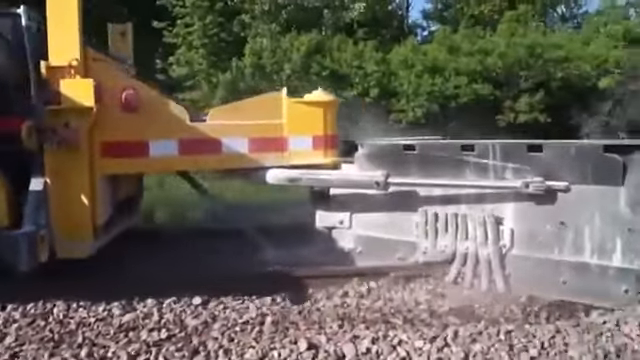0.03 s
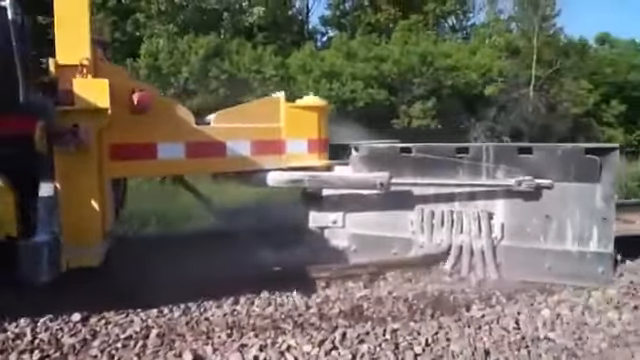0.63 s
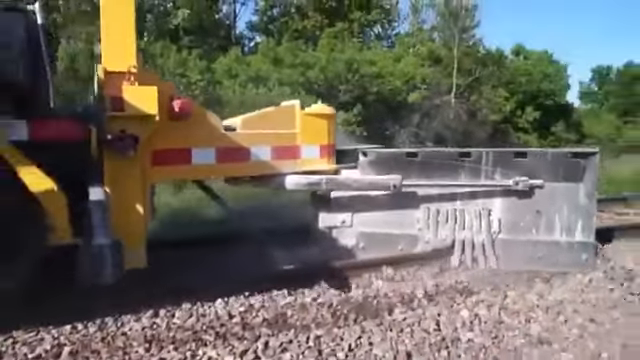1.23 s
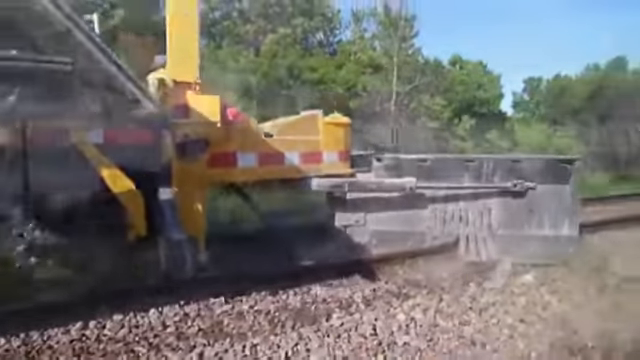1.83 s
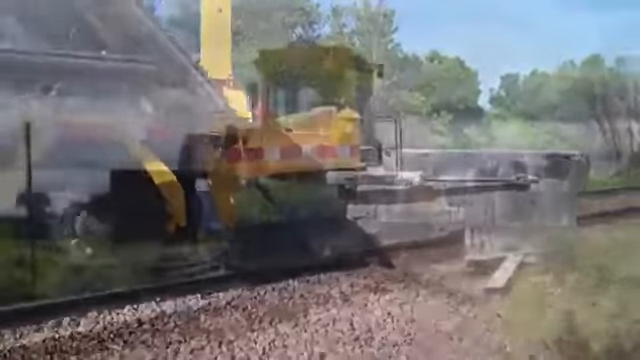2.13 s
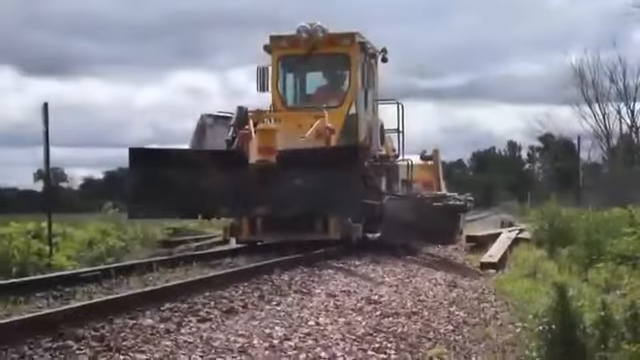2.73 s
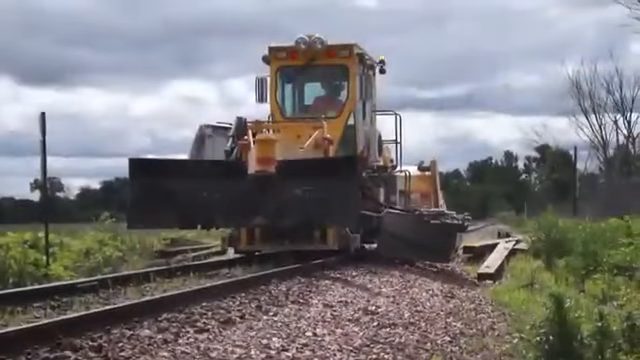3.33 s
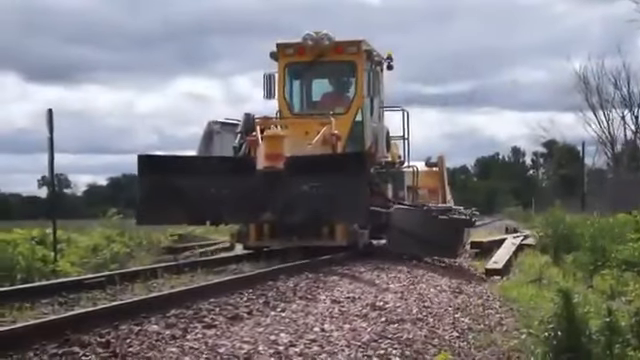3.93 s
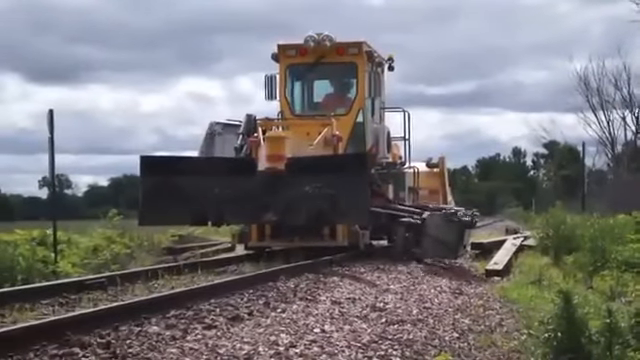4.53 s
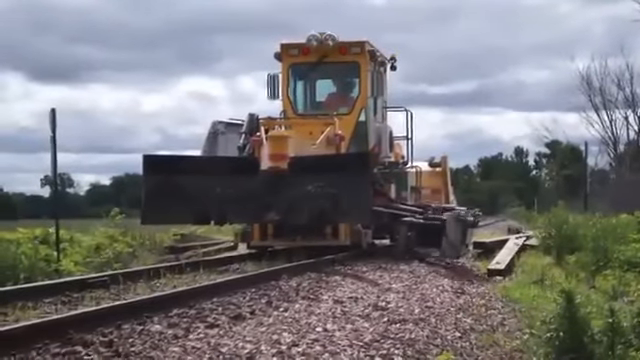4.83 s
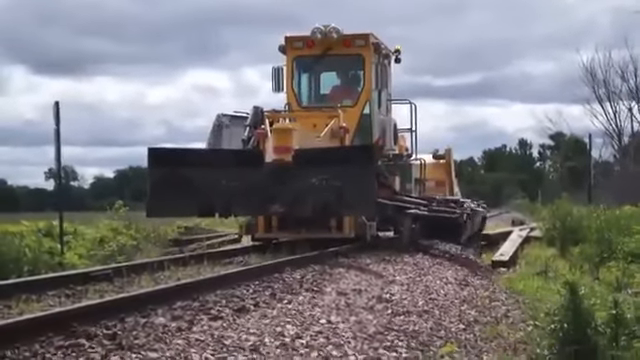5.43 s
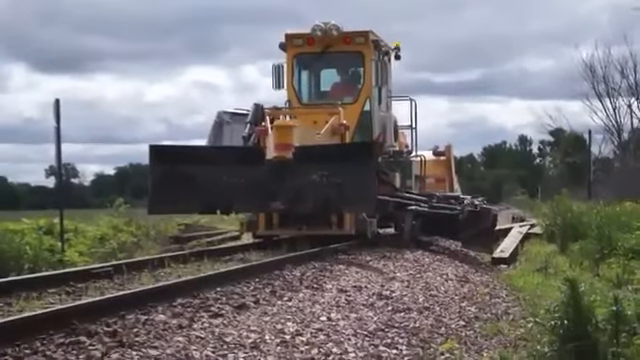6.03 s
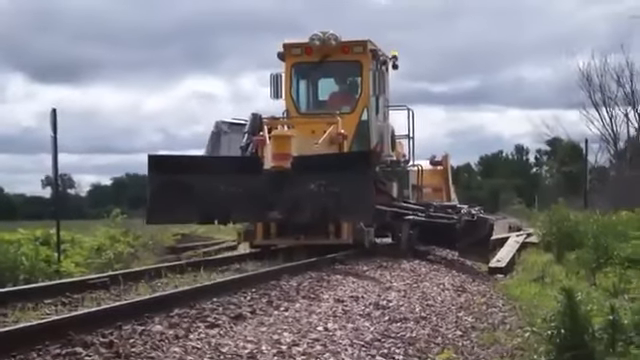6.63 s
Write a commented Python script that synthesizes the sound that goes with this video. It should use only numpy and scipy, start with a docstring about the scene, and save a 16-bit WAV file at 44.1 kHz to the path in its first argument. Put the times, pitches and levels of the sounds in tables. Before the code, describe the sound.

Stones grind against groaning steel, giving way to a more distant high-revving diesel engine, hydraulic whine and a few clanks.

```python
"""Stones grind and chink close by as a ballast regulator's steel wing ploughs them, ringing and groaning.
From about 2 s this fades into the machine further down the track. Its diesel runs at high revs and
drives two hydraulic pumps, which whine and pull the revs down as they move the wing. From about 4 s
the wing clanks in its joints. Two microphone ports in a small housing listen from the trackside."""
import sys
import numpy as np
from scipy import signal
from scipy.fft import rfft, irfft, next_fast_len
from scipy.io import wavfile

SR = 44100
rng = np.random.default_rng(int(sys.argv[2]) if len(sys.argv) > 2 else 0)


def put_to_file(sound):
    """Save the sound as 16-bit audio at rate SR, in the file named by the first command-line argument."""
    columns = np.atleast_2d(sound).T  # one column per channel
    safe = np.clip(columns, -1, 1)
    whole_steps = np.round(safe * 32767)
    wavfile.write(sys.argv[1], SR, whole_steps.astype(np.int16))


N = 294588
T = np.arange(N) / SR
FFT_SIZE = next_fast_len(N + 8192)
HZ = np.fft.rfftfreq(FFT_SIZE, 1 / SR)

# All table levels are relative.
# Push into the heap. Each row: time in seconds, then heave, grind and crunch levels in dB.
PLOUGH_LEVELS = [(0, -28.5, -23, -21.5), (.7, -28.5, -20, -22.5), (1.35, -29, -20.5, -22.5),
                 (1.75, -28, -22.5, -24.5), (2.2, -32.5, -27.4, -29.5), (2.55, -41, -35.5, -35.5),
                 (2.9, -54, -33, -43)]
# Stone noise. Each row: frequency in Hz, density in dB.
STONE_SPECTRUM = [(40, -52), (95, -42), (165, -11.5), (260, -10), (430, 0), (600, -2.5), (800, 2.5),
                  (1200, 2), (1900, -7.5), (2900, -8), (4100, -5), (6000, -12.5), (10000, -23.5),
                  (12500, -34.5)]
# Wing plate resonances. Each row: frequency in Hz, width in Hz, level in dB.
PLATE_MODES = [(200, 8, -47), (252, 12, -45), (296, 10, -39), (462, 10, -34), (662, 7, -37), (904, 8, -36),
               (1815, 18, -37), (1910, 20, -35.5), (1990, 18, -37.5), (2654, 5, -42), (3850, 50, -37)]
# Stones on the plate close by, later knocks from the distant machine.
# Each row: start in seconds, level in dB, pitch in Hz, swell in seconds.
THUMPS = [(0, -22.5, 294, 0.022), (0.268, -16.5, 1240, 0.008), (.278, -27, 2700, 0.011),
          (.28, -24.5, 4830, 0.0075), (0.698, -18, 890, 0.019), (0.713, -17, 450, 0.012),
          (1.06, -19.5, 423, .022), (1.18, -21, 2780, 0.0063), (1.235, -12, 1210, 0.0049),
          (1.326, -20.5, 433, 0.013), (1.395, -21.5, 248, 0.028), (1.413, -19.5, 480, 0.012),
          (1.43, -36, 182, 0.018), (1.611, -22.5, 1870, 0.0067), (1.71, -30, 307, 0.0064),
          (1.833, -25, 480, 0.013), (1.898, -26.5, 278, 0.011), (2.2, -25, 410, 0.0079),
          (2.28, -20, 830, 0.0069), (2.37, -24.5, 1000, 0.021), (5.269, -24, 840, 0.0022),
          (5.709, -33, 330, 0.0027)]
# Wing groans and one brief swell of the second pump.
# Each row: start and length in seconds, pitch in Hz, level in dB.
WAVERING_TONES = [(0.04, 0.7, 753, -33.5), (0.563, 0.11, 735, -24.5), (1.107, 0.68, 1195, -25.5),
                  (1.283, 0.907, 743, -28.5), (1.724, 0.52, 750.7, -29), (1.776, 0.48, 1198, -32.5),
                  (2.304, 0.22, 1218, -33.5)]
# Wing rubs, and the main pump's fourth harmonic swelling twice.
# Each row: start and length in seconds, pitch and width in Hz, level in dB.
ROUGH_TONES = [(1.297, 0.42, 1200, 8.7, -45), (2.427, 0.29, 714, 8.2, -36.5), (2.66, 0.091, 1240, 71, -34),
               (2.723, 0.98, 1488, 20, -43.5), (3.657, 0.32, 1682, 10, -44.5),
               (4.303, 0.35, 1622, 11, -41.5)]
# Firing strengths. Each entry: one cylinder's level in dB.
CYLINDERS_DB = [7.9, 2.7, 5.6, 1.7, 4.3, 3.6]
# Block and fan noise. Each row: frequency in Hz, density in dB.
ENGINE_SPECTRUM = [(25, -32), (55, -25.5), (95, -29), (160, -23.5), (280, -12), (400, -8), (600, -8.5),
                   (680, -4.5), (745, 2), (1200, -2), (1800, -8.5), (3000, -16), (4300, -14.5),
                   (9000, -32.5), (11500, -64)]
# Exhaust tones. Each row: multiple of the crank rate, level in dB.
EXHAUST_ORDERS = [(3, -70), (4.5, -62), (6, -59), (7, -64), (8, -61), (9, -56), (12, -57), (15, -55)]
# Pump tones. Each row: multiple of that pump's tooth rate, level in dB.
NEAR_MAIN_ORDERS = [(1, -33), (2, -36), (4, -39), (10, -46)]
NEAR_SECOND_ORDERS = [(1, -35), (2, -32), (3, -32.5)]
FAR_HUM_ORDERS = [(1, 0), (4, -8), (11, -19), (13, -23)]  # main pump, running free
FAR_STRAIN_ORDERS = [(3, -22), (6, -25.5), (7, -19.5), (8, -24), (9, -25.5), (10, -20), (11, -24),
                     (12, -24), (14, -30), (15, -28), (16, -35), (17, -36)]  # main pump, under pressure
FAR_SECOND_ORDERS = [(1, -50.5), (2, -41), (3, -50), (5, -55)]
# Valve feeding the wing's cylinders. Each row: opening and closing in seconds, whine level in dB.
STROKES = [(2.15, 3.597, -35), (3.97, 5.749, -33.5), (6.006, 6.267, -29.5)]
# Swells as the machine creeps on. Each row: time in seconds, then whine, feed pipe and whistle in dB.
SWELLS = [(2.5, 2, -17.5, -27), (2.93, 1, -5.5, -22), (3.25, 1, -9.5, -21), (3.42, 3, -14.5, -18),
          (3.58, 2, -11, -15), (4.05, -0.5, -10, -18), (4.25, -9, -8, -25), (4.37, -0.5, -9, -12),
          (4.6, -3.5, -17, -26), (4.85, 1.5, -11.5, -19), (5.15, -3, -8, -14), (5.45, -3.5, -8.5, -15),
          (5.72, 1, -8, -21), (6.2, -8.5, -12, -25)]
# Far second pump's swells. Each row: time in seconds, gain in dB.
SECOND_SWELLS = [(2.6, 2), (2.9, -2), (3.38, 3), (3.6, 1), (4.0, 0), (4.45, -2), (5.3, -0.5), (5.9, 0),
                 (6.68, 2)]
# Joints taking up slack. Each row: start in seconds, level in dB, swell in seconds,
# tilt in dB per octave, frame ring in dB.
CLANKS = [(4.099, -31, 0.0097, -4, 8.5), (4.32, -38, 0.011, -4.5, 2), (5.733, -36, 0.0067, -1, 8),
          (5.765, -27.5, .016, 1, -10), (6.036, -30, 0.01, -0.5, 2), (6.214, -22.5, 0.019, -1.3, -11),
          (6.274, -23, 0.017, 1.1, -15), (6.322, -24.5, 0.0075, -1.5, 0), (6.353, -34, 0.0074, -3, 6)]
# Hard steel contacts. Each row: start in seconds, level in dB, tilt in dB per octave.
CONTACTS = [(4.104, -29, -1), (5.767, -33, 5), (5.783, -21.5, 0), (5.805, -30, 2), (6.053, -27.5, 0),
            (6.213, -22, 1), (6.224, -16, -.5), (6.232, -20, -2), (6.277, -20, 1.5), (6.286, -16.5, .5),
            (6.292, -19, 0), (6.341, -19.5, 0)]
# Clank noise. Each row: frequency in Hz, density in dB.
CLANK_SPECTRUM = [(50, -42), (100, -29), (160, -10), (400, -4.5), (800, 0.5), (1200, 2.5), (1900, -3),
                  (3000, -9.5), (4500, -12.5), (6300, -22.5), (8300, -31), (10500, -75)]
# Wing frame resonances. Each row: frequency in Hz, width in Hz, level in dB.
FRAME_MODES = [(772, 46, -12.5), (1090, 85, -13.5), (1626, 9.6, -19.5), (1747, 43, -15.5),
               (1960, 120, -12.5), (2665, 60, -23), (3100, 28, -25.5), (4034, 36, -21.5), (4830, 57, -27)]
# Likeness of the two ports, general and for the joints. Each row: frequency in Hz, likeness from 0 to 1.
PORT_LIKENESS = [(40, .4), (100, 0.56), (200, 0.9), (420, 0.8), (800, 0.89), (1200, 0.34), (1900, 0.073),
                 (3000, 0.48), (5500, 0.28), (5900, 0.68), (7500, 0.79), (12000, 0.34)]
JOINT_LIKENESS = [(100, .98), (650, .98), (1200, .9), (3000, .86), (5000, .6), (9000, .5)]
# Port phase, general and for the joints on the right. Each row: frequency in Hz, left lead in radians.
PORT_LEAD = [(100, 0), (600, .2), (1200, 1), (1600, 1), (2000, -.2), (2900, -1.4), (4100, -1.7),
             (5500, -2.2), (5800, 0), (12000, 0)]
JOINT_LEAD = [(100, 0), (700, 0), (1200, -.3), (2500, -.55), (4300, -1), (5500, -.7), (5800, 0)]
# Port balance. Each row: frequency in Hz, left minus right in dB.
PORT_BALANCE = [(60, 1.5), (110, -2), (200, -1), (360, -2), (650, -1.0), (1190, -1), (2160, -1), (3920, -3),
                (7120, -1), (12900, -4)]
# Dips in the housing's response. Each row: centre in Hz, width in Hz, gain in dB.
HOUSING_DIPS = [(597, 14.3, -8), (1390, 87.6, -10.5), (2330, 154, -6.5), (2383, 39, -16.5),
                (3468, 132, -9.5)]

FADE_START_S, FADE_LENGTH_S = 2.04, 0.81  # near to far
NEAR_TOOTH_HZ, GOVERNED_TOOTH_HZ = 411.8, 410.1  # main pump
SECOND_RATIO, CRANK_RATIO = .8794, .08905  # to the main tooth rate
BUILD_S, STRAIN_S, DUMP_S = 0.0577, 0.29, 0.036  # oil pressure rises, load builds, both let off
BAND_LIMIT_HZ = 12750


def gain_of(db):
    """Decibels to amplitude."""
    return 10 ** (np.asarray(db) / 20)


def unit_rms(x):
    """Scales to rms 1."""
    return x / np.sqrt(np.mean(x ** 2) + 1e-20)


def spectrum(rows):
    """A table at every FFT bin, interpolated in log frequency."""
    hz, value = np.transpose(rows)
    return np.interp(np.log(HZ + 1), np.log(hz + 1), value)


def curves(rows):
    """A table's columns at every sample."""
    times_s, *columns = np.transpose(rows)
    return [np.interp(T, times_s, column) for column in columns]


def colour(x, gain):
    """Filters by a gain per FFT bin."""
    return irfft(rfft(x, FFT_SIZE) * gain, FFT_SIZE)[..., :N]


def wander(rate_hz):
    """Random drift, mean 0, rms 1."""
    drift = colour(rng.standard_normal(FFT_SIZE), np.exp(-(HZ / rate_hz) ** 2))
    return unit_rms(drift - drift.mean())


def ringing(hz, width_hz):
    """Noise-driven resonance, rms 1."""
    peak = 1 / (1 + ((HZ - hz) / (2 * width_hz)) ** 2) ** 3
    return unit_rms(colour(rng.standard_normal(FFT_SIZE), peak))


def tones(cycles, orders, flutter, fade_db=0):
    """Shaft overtones; each flutters in outdoor air and may fade slowly as the machine moves."""
    out = 0
    for order, db in orders:
        shimmer = 1 + flutter * (wander(21) + 1j * wander(28))
        level = gain_of(db + fade_db * wander(0.78))
        out += level * (shimmer * np.exp(2j * np.pi * (order * cycles + rng.random()))).real
    return np.sqrt(2) * out


def since(start_s):
    """Seconds since the start, zero before."""
    return np.maximum(T - start_s, 0)


def gate(start_s, end_s, attack_s, release_s):
    """Linear attack, hold, exponential release."""
    return np.minimum(since(start_s) / attack_s, 1) * np.exp(-since(end_s) / release_s)


def blow(start_s, swell_s):
    """Impact envelope: peaks after the swell time, then decays."""
    age = since(start_s) / swell_s
    return age * np.exp(1 - age)


def trapezoid(start_s, length_s, edge_s=0.04):
    """Envelope: swells, holds, dies."""
    return np.clip(np.minimum(T - start_s, start_s + length_s - T) / edge_s, 0, 1)


def nearness():
    """Crossfade: 1 near, 0 far."""
    return np.clip(1 - since(FADE_START_S) / FADE_LENGTH_S, 0, 1)


def ports(x, likeness=PORT_LIKENESS, lead=PORT_LEAD):
    """Two microphone ports differ in phase and level; a signal pair arrives only partly alike."""
    same = np.clip(spectrum(likeness), 0, .99) if x.ndim == 2 else 1
    left, other = rfft(x * np.ones((2, 1)), FFT_SIZE)
    right = (same * left + np.sqrt(1 - same ** 2) * other) * np.exp(-1j * spectrum(lead))
    balance = gain_of(spectrum(PORT_BALANCE) / 2)
    return irfft(np.array([left * balance, right / balance]), FFT_SIZE)[:, :N]


def plough(knocks_per_s=3500, spread_db=2, wash_gain=1.08, chink_db=-2, slides_db=(1.4, 1.06, 1.27)):
    """Thousands of stones knock together; the heap heaves, grinds and crunches in small random slides."""
    sizes = gain_of(spread_db * np.minimum(rng.exponential(1, (2, N)), 5)) * rng.choice([-1, 1], (2, N))
    stones = unit_rms(sizes * (rng.random((2, N)) < knocks_per_s / SR))
    stones += wash_gain * rng.standard_normal((2, N))
    stones += gain_of(chink_db) * unit_rms(np.array([chinks(), chinks()]))
    heave = 1 / (1 + (HZ / 600) ** 8)
    crunch = 1 - 1 / (1 + (HZ / 2400) ** 8)
    grind = np.maximum(1 - heave - crunch, 0)
    heap = 0
    for share, level_db, slide_db in zip([heave, grind, crunch], curves(PLOUGH_LEVELS), slides_db):
        band = colour(stones, np.sqrt(share) * gain_of(spectrum(STONE_SPECTRUM)))
        band /= band[:, T < FADE_START_S].std()
        heap += band * gain_of(level_db + slide_db * wander(17.3))
    return ports(heap * np.clip(3 * nearness(), 0, 1))


def chinks(count=9000, decay_s=.003, spread_db=2.2, lowest_hz=1800):
    """Colliding stones ring briefly, each with its own size and pitch."""
    when, pitch, size, phase = rng.random((count, 4)).T[:, :, None]
    n = np.arange(round(4 * decay_s * SR))
    level = gain_of(spread_db * np.minimum(-np.log(1 - size), 4.5))
    hz = lowest_hz + pitch * (BAND_LIMIT_HZ - lowest_hz)
    rings = level * np.exp(-n / SR / decay_s) * np.sin(2 * np.pi * (hz * n / SR + phase))
    samples = (when * (FADE_START_S + FADE_LENGTH_S) * SR).astype(int) + n
    return np.bincount(samples.ravel(), rings.ravel(), N)[:N]


def plate(boost_db=17):
    """The wing's steel plate rings as hard as the stones grind."""
    modes = sum(gain_of(db) * ringing(hz, width_hz) for hz, width_hz, db in PLATE_MODES)
    grind_db = curves(PLOUGH_LEVELS)[1]
    return gain_of(boost_db + grind_db) * np.sqrt(nearness()) * modes


def thumps(width_ratio=0.092):
    """Thumps and cracks: stones on the plate close by, later knocks from the distant machine."""
    return sum(gain_of(db) * blow(start_s, swell_s) * ringing(hz, hz * width_ratio)
               for start_s, db, hz, swell_s in THUMPS)


def diesel(crank_turns, load, knock_share=0.18, noise_db=-34.5, load_db=-0.3, exhaust_db=-5, fan_hz=1800):
    """Six cylinders fire in two turns and rattle the block; the fan rushes, the exhaust drones."""
    firings = 3 * crank_turns
    strength = gain_of(CYLINDERS_DB)[firings.astype(int) % len(CYLINDERS_DB)]
    pulses = unit_rms(strength * np.exp(-(firings % 1) / 0.11))
    knock = unit_rms(1 - knock_share + knock_share * pulses) * gain_of(0.87 * wander(24))
    block_share = 1 / (1 + (HZ / fan_hz) ** 2)
    shape = gain_of(spectrum(ENGINE_SPECTRUM))
    clatter = colour(knock * rng.standard_normal((2, N)), shape * np.sqrt(block_share))
    fan = colour(rng.standard_normal((2, N)), shape * np.sqrt(1 - block_share))
    noise = gain_of(noise_db + load_db * load) * unit_rms(clatter + fan)
    exhaust = gain_of(exhaust_db) * tones(crank_turns, EXHAUST_ORDERS, flutter=0.22)
    return ports(noise) + ports(exhaust)


def near_pumps(main_db=-1, second_db=-1.5):
    """Both pumps drone close by under the plough's steady load."""
    teeth = NEAR_TOOTH_HZ * T
    main = gain_of(main_db) * tones(teeth, NEAR_MAIN_ORDERS, flutter=0.14)
    second = gain_of(second_db) * tones(teeth * SECOND_RATIO, NEAR_SECOND_ORDERS, flutter=0.21)
    return ports(nearness() * main + nearness() ** 2 * second)


def wavering_tones(waver=0.0024):
    """Short wavering tones: wing groans and one brief swell of the second pump."""
    out = 0
    for start_s, length_s, hz, db in WAVERING_TONES:
        cycles = np.cumsum(hz * (1 + waver * wander(27))) / SR
        out += gain_of(db) * trapezoid(start_s, length_s) * tones(cycles, [(1, 0)], flutter=.15)
    return out


def rough_tones():
    """Rough narrow tones: wing rubs, and the main pump's fourth harmonic swelling twice."""
    return sum(gain_of(db) * trapezoid(start_s, length_s) * ringing(hz, width_hz)
               for start_s, length_s, hz, width_hz, db in ROUGH_TONES)


def far_pumps(teeth, tooth_hz, hum_db=-50, strain_db=1, return_db=-38.5, return_s=.11, feed_pan_db=-10.5):
    """The pumps hum; under pressure the main one whines and whistles, and the pipework rings along."""
    pressure, strain, backflow = 0, 0, 0
    for open_s, close_s, db in STROKES:
        pressure += gain_of(db) * gate(open_s, close_s, BUILD_S, DUMP_S)
        strain += gain_of(db) * gate(open_s, close_s, STRAIN_S, DUMP_S)
        backflow += blow(close_s, return_s) ** 2  # oil rushes through the return pipe
    whine_db, feed_db, whistle_db = curves(SWELLS)
    hum = gain_of(hum_db) * tones(teeth, FAR_HUM_ORDERS, flutter=.15)
    whine = gain_of(whine_db) * tones(teeth, [(2, 0)], flutter=.09)
    whistle = gain_of(whistle_db) * tones(teeth, [(13, 0)], flutter=.11)
    overtones = gain_of(strain_db) * tones(teeth, FAR_STRAIN_ORDERS, flutter=.22, fade_db=1.5)
    sag_hz = np.maximum(GOVERNED_TOOTH_HZ - tooth_hz, 0)
    feed = gain_of(feed_db + 0.1 * sag_hz) * pipe(teeth, tooth_hz, order=5, hz=2052, width_hz=14)
    return_pipe = gain_of(return_db) * pipe(teeth, tooth_hz, order=1, hz=423, width_hz=10)
    main = hum + pressure * (whine + whistle) + strain * overtones + backflow * return_pipe
    second = tones(teeth * SECOND_RATIO, FAR_SECOND_ORDERS, flutter=.14, fade_db=.8)
    second *= gain_of(curves(SECOND_SWELLS)[0])
    feed_pan = gain_of([[feed_pan_db / 2], [-feed_pan_db / 2]])
    return np.sqrt(1 - nearness()) * (ports(main + second) + feed_pan * ports(pressure * feed))


def pipe(teeth, tooth_hz, order, hz, width_hz):
    """One pump overtone, loudest when the revs bring it onto the pipe's resonance."""
    detuning = 2 * (order * tooth_hz - hz) / width_hz
    return tones(teeth, [(order, 0)], flutter=.15) / np.hypot(1, detuning)


def governor(load_step_hz=-17.2, release_step_hz=21, inertia_s=.05, recovery_s=.32):
    """Main tooth rate in Hz: each load step is smoothed by the flywheel and slowly governed out."""
    tooth_hz = GOVERNED_TOOTH_HZ
    for open_s, close_s, _ in STROKES:
        for start_s, step_hz in [(open_s + BUILD_S, load_step_hz), (close_s, release_step_hz)]:
            age_s = since(start_s)
            tooth_hz += step_hz * (np.exp(-age_s / recovery_s) - np.exp(-age_s / inertia_s))
    return tooth_hz


def clanks(crack_s=.004, ring_s=.012, contact_ring_db=-7, tail_db=-21, tail_swell_s=0.08):
    """Joints take up slack: a dense steel rattle with a few hard contacts, and the frame rings briefly."""
    frame = sum(gain_of(db) * ringing(hz, width_hz) for hz, width_hz, db in FRAME_MODES)
    rattle, snap = rng.standard_normal((2, 2, N))
    octaves = np.log2((HZ + 100) / 1000)
    body_db = spectrum(CLANK_SPECTRUM)
    steel, ring = 0, 0
    for start_s, db, db_per_octave in CONTACTS:
        crack = snap * (T >= start_s) * np.exp(-since(start_s) / crack_s)
        steel += gain_of(db) * colour(crack, unit_rms(gain_of(body_db + db_per_octave * octaves)))
        ring += gain_of(db + contact_ring_db) * gate(start_s, start_s, crack_s, ring_s) * unit_rms(frame)
    for start_s, db, swell_s, db_per_octave, ring_db in CLANKS:
        level = gain_of(db) * (blow(start_s, swell_s) + gain_of(tail_db) * blow(start_s, tail_swell_s))
        level /= np.hypot(1, gain_of(ring_db) * frame.std())  # rattle and ring share the power
        steel += level * unit_rms(colour(rattle, gain_of(body_db + db_per_octave * octaves)))
        ring += level * gain_of(ring_db) * frame
    return ports(steel, JOINT_LIKENESS, JOINT_LEAD) + ports(ring, lead=JOINT_LEAD)


def scene(engine_db=2, near_boost_db=4):
    """Engine and far pumps share one shaft speed; near pumps, stones and wing join them."""
    tooth_hz = governor()
    teeth = np.cumsum(tooth_hz) / SR
    load = sum(gate(open_s, close_s, STRAIN_S, DUMP_S) for open_s, close_s, _ in STROKES)
    engine = gain_of(engine_db + near_boost_db * nearness()) * diesel(teeth * CRANK_RATIO, load)
    pumps = far_pumps(teeth, tooth_hz) + near_pumps()
    stones = plough()
    tones_and_thumps = ports(plate() + wavering_tones() + rough_tones() + thumps())
    return engine + pumps + stones + tones_and_thumps + clanks()


def record(dry):
    """Housing dips, then the band limit."""
    dips_db = sum(db * np.exp(-.5 * ((HZ - hz) / width_hz) ** 2) for hz, width_hz, db in HOUSING_DIPS)
    lowpass = signal.firwin(511, BAND_LIMIT_HZ, window=("kaiser", 9), fs=SR)
    return signal.oaconvolve(colour(dry, gain_of(dips_db)), lowpass[None], "same")


dry = scene()
out = record(dry)
put_to_file(out)
```